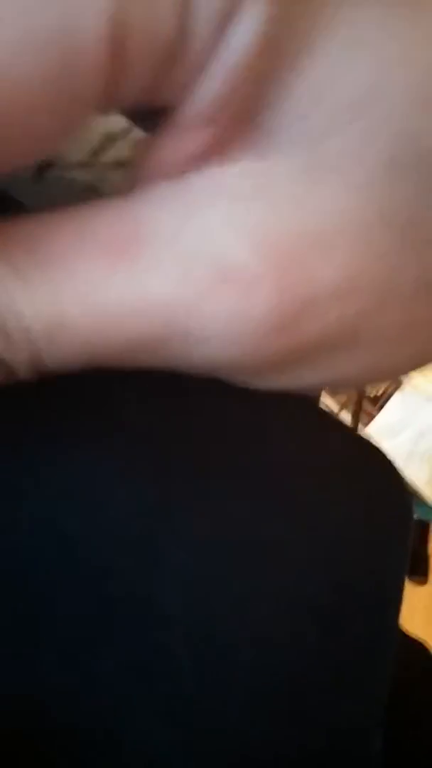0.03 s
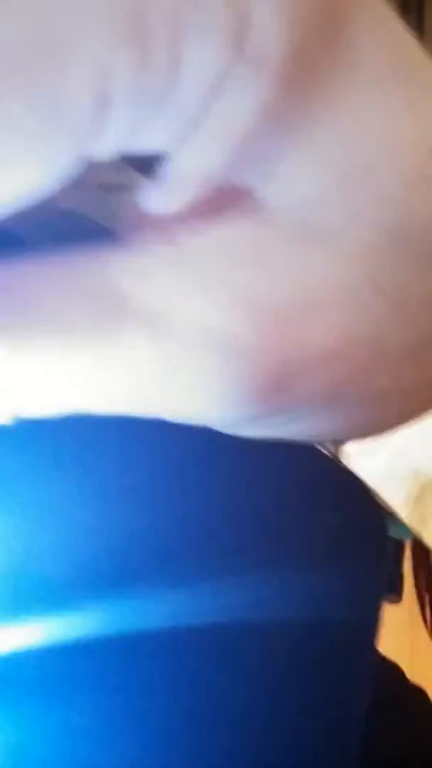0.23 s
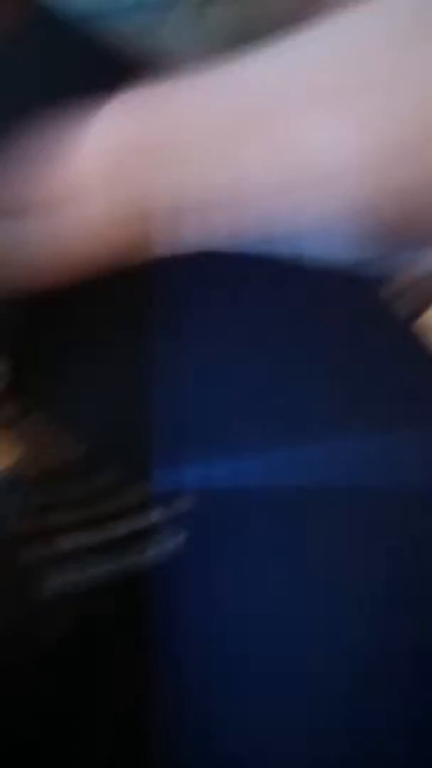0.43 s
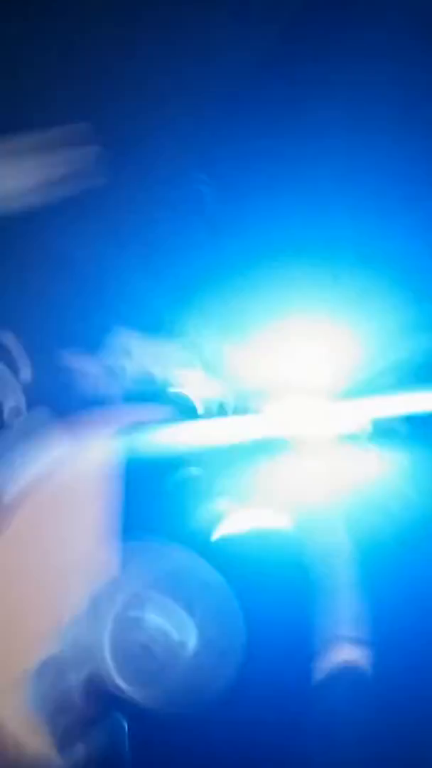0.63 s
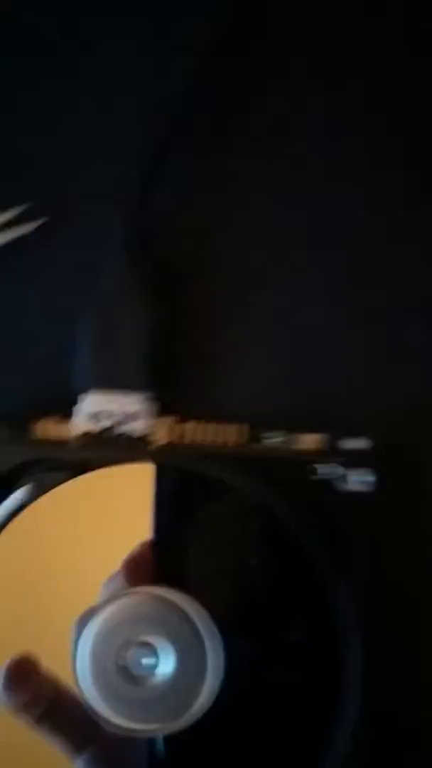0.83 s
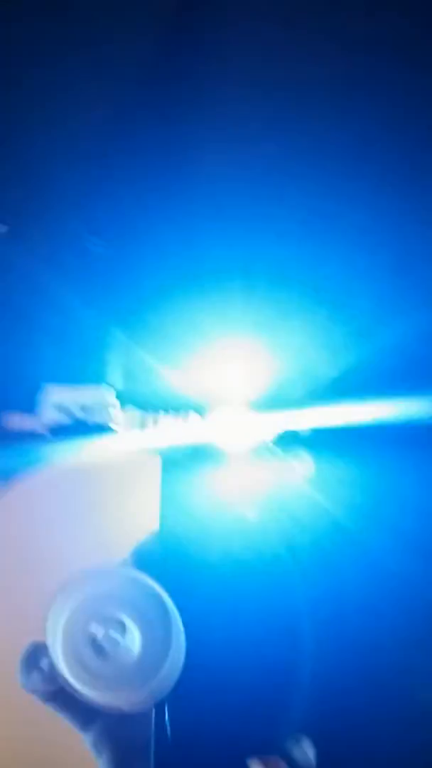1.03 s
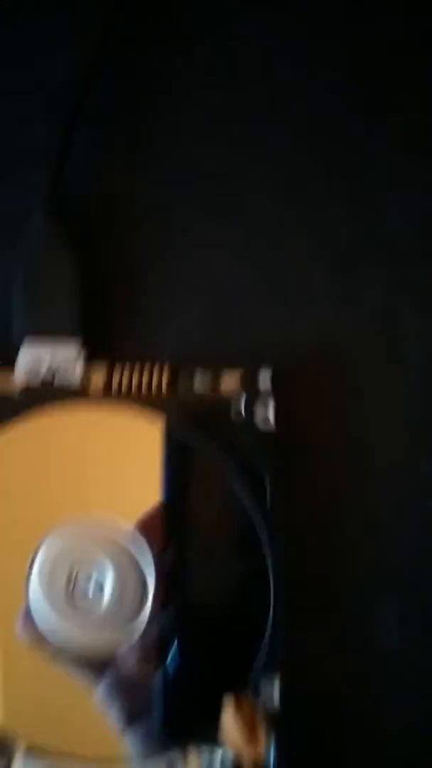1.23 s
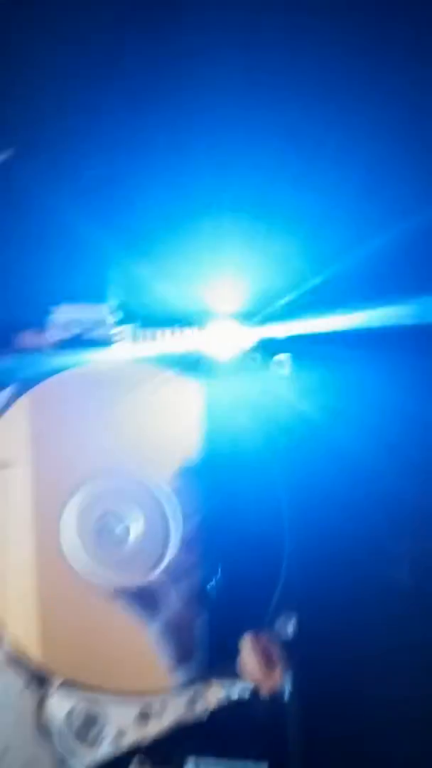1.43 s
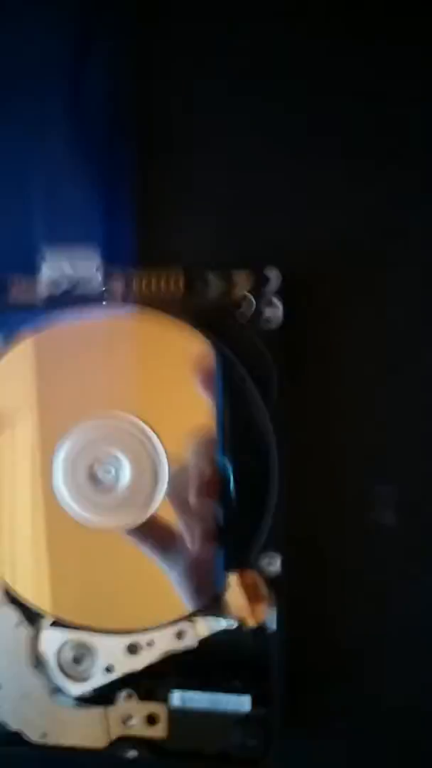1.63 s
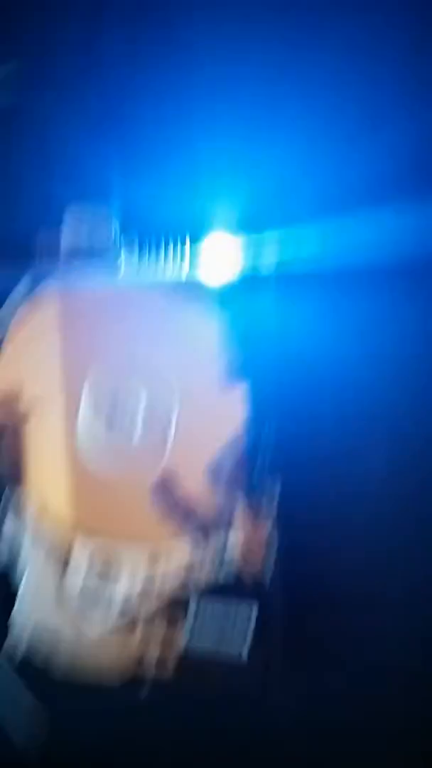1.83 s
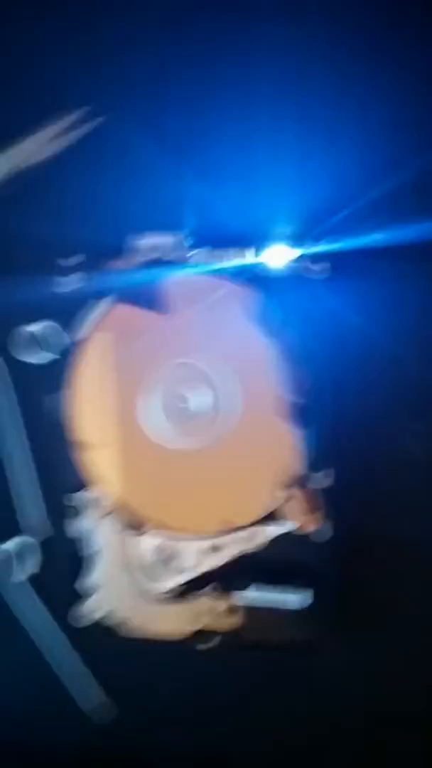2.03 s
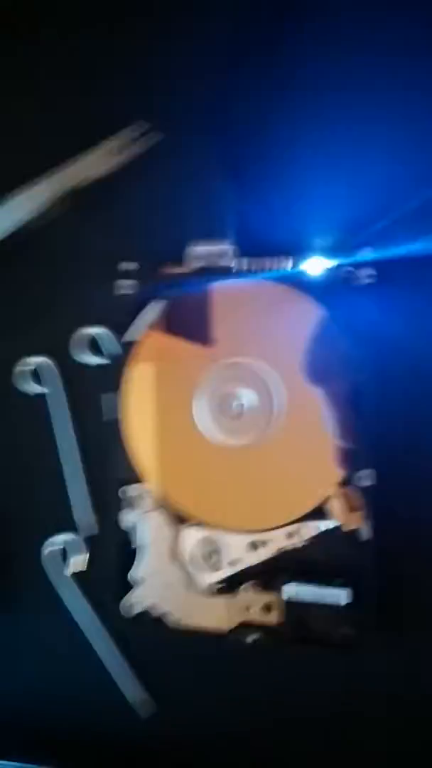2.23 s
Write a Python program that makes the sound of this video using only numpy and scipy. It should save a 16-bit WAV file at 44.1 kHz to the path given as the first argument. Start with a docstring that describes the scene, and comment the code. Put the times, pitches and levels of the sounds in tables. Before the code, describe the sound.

An opened hard drive is handled close by, with a hollow knock at 0.2 seconds and a sharp, rattling metal clack at 0.4, the loudest sound. Fingers softly brush and bump the casing. From 1.8 seconds come a few small dry ticks, the clearest at about 2.3. Throughout, a quiet fan rushes with a thin whine and a slowly pulsing low hum in a small room.

```python
"""An opened hard drive is handled close to the microphone in a small room.
From the start a fan rushes and whines, its motor beating slowly against the mains hum.
A hollow knock on the casing at 0.2 s is followed at 0.4 s by a rattling metal clack.
Fingers softly brush and bump the casing while the background sinks briefly several times.
From 1.8 s a few small dry ticks sound, the last one the loudest."""
import sys
import numpy as np
from scipy import signal
from scipy.fft import rfft, irfft
from scipy.io import wavfile

SR = 44100
rng = np.random.default_rng(int(sys.argv[2]) if len(sys.argv) > 2 else 0)


def to_wav(sig):
    """Store sig (one row per channel, or 1-D mono) as 16-bit WAV at the path in sys.argv[1].

    Samples outside -1..1 are clipped; the rate is SR.
    """
    pcm = np.clip(np.atleast_2d(sig), -1, 1) * 32767
    pcm = np.round(pcm).astype(np.int16)
    wavfile.write(sys.argv[1], SR, pcm.T)  # frames by channels


N = 105840
T = np.arange(N) / SR
HZ = np.maximum(np.fft.rfftfreq(N, 1 / SR), 1)
AGE = np.arange(SR // 2) / SR   # seconds since a hit

# the clack, a quick run of metal contacts: (time [s], level [dB])
CLACK_HITS = [(0.4194, -11.5), (0.4294, -9.5), (0.4342, -9), (0.4354, -7), (0.4372, -0.5), (0.4387, -2.5),
              (0.4398, -10.5)]
# the metal's ring: (frequency [Hz], level [dB], t60 [s], left minus right [dB])
METAL_MODES = [(2400, -35, .02, 4.5), (3110, -32, .022, 17), (3560, -41, 0.028, 9.5),
               (4000, -29, 0.021, 13.5), (4449, -26, .03, 11), (4570, -35.5, 0.071, 8),
               (5856, -20.5, .015, 17), (6290, -24.5, .022, 18), (6450, -39, .09, 15.5),
               (6830, -10.5, 0.013, 17.5), (6550, -40, .25, 12.5), (7875, -27, 0.014, 10.5),
               (8570, -20.5, 0.025, 14.5), (9100, -28, .018, 3.5), (12300, -25.5, 0.006, -14.5)]
# tone colour of each contact's crack: (frequency [Hz], level [dB])
CRACK_COLOUR = [(200, -46), (600, -36), (900, -21), (1500, -18), (2800, -5), (4300, -11), (5200, -6),
                (7000, 3), (9000, -2.5), (10500, -16), (16000, -27.5)]
# blows on the casing, light touches before the weight: (time [s], edge level [dB], body level [dB])
KNOCK_HITS = [(0.217, -21, -48.5), (0.2184, -29, -39), (0.2201, -38.5, -19.5), (0.2224, -31.5, -20),
              (0.2425, -43.5, -39), (0.4384, -36, -22), (0.4403, -39.5, -20.5)]
# the casing's hollow body: (frequency [Hz], level [dB], t60 [s], left minus right [dB])
CASING_MODES = [(865, -16, 0.016, -6.5), (1108, -7, 0.022, -3.5), (1790, -13.5, 0.016, 11.5),
                (2450, -17, 0.027, 5), (3380, -16.5, 0.016, 15), (4200, -17.5, .016, 5),
                (5250, -11.5, 0.015, 11), (6760, -15.5, 0.011, 7)]
# tone colour of the knock's edge: (frequency [Hz], level [dB])
EDGE_COLOUR = [(500, -34.5), (1300, -12), (3500, -14), (5000, -0.5), (8000, 4.5), (10500, -6), (12000, -18),
               (16000, -18)]
# small dry ticks: (time [s], level [dB], left minus right [dB], pitch [ratio])
TICK_HITS = [(1.8485, -50.5, 12, 1.2), (2.0395, -45, 9, 1.55), (2.0490, -41.5, 21.5, 1.454),
             (2.2602, -24, 23.5, 0.984)]
# a tick's ring before it is pitched: (frequency [Hz], level [dB], t60 [s])
TICK_RING = [(3950, -14.5, 0.021), (4720, -1, 0.005), (5660, 2, 0.0054), (6280, -2, 0.0056),
             (7400, -1, 0.002), (10000, -5.5, 0.0018), (13500, -8, .0012)]
# airy finger brushes: (time [s], width [s], level [dB], centre [Hz])
FINGER_BRUSHES = [(0.94, 0.022, -58, 7820), (1.575, 0.018, -61, 13900), (1.851, .005, -50.5, 9250)]
# soft handling bumps: (time [s], width [s], level [dB], centre [Hz])
FINGER_BUMPS = [(0.04, 0.038, -43.5, 337), (0.19, 0.016, -41.5, 800), (0.69, 0.03, -47, 287),
                (1.15, 0.038, -53.5, 326), (1.54, .012, -51, 300), (1.835, 0.016, -41.5, 308),
                (1.972, .008, -44.5, 790), (2.04, 0.02, -43, 315.5), (2.4, 0.029, -46.5, 363)]
# fan and housing resonances: (frequency [Hz], width [Hz], level [dB], left minus right [dB])
FAN_RESONANCES = [(41, 6, -63, 12), (86.4, 8, -62.5, -0.5), (105.2, 5, -59, 2), (121, 9.2, -63, 0.5),
                  (236, 12, -62, 5), (258.1, 8, -59.5, 6.5), (289.25, 4, -54, 3.5), (322.2, 6, -58, 10.5),
                  (371, 30, -61, 9), (743, 44, -57, 7), (860, 180, -59, -4.5), (1808, 160, -73, 13),
                  (8610, 110, -78.5, 8)]
# fader on the fan's tones as the microphone moves: (time [s], gain [dB])
FAN_FADER = [(0, 7.5), (0.3, 2.5), (0.68, 1.5), (0.95, -6), (1.3, 0.5), (1.5, -1.5), (1.68, 4.5),
             (1.85, -1), (2.15, 1), (2.4, 1)]
# tone colour of the rushing air: (frequency [Hz], level [dB])
AIR_COLOUR = [(20, -23), (40, -8.5), (60, -5), (110, 5), (165, -1), (280, 6.5), (380, -3), (470, -8),
              (620, -4.5), (780, 8), (1050, -3.5), (1300, -7), (1600, -17.5), (2400, -14), (3300, -15.5),
              (4400, -21), (7500, -15.5), (11000, -25.5), (15500, -26.5)]
# tone colour of the rush's midrange: (frequency [Hz], level [dB])
MID_COLOUR = [(400, -25.5), (700, 3), (1200, 7.5), (2000, 2), (2600, -13.5), (5000, -21)]
# fader on that midrange: (time [s], level [dB])
MID_FADER = [(0, -51), (0.3, -54.5), (0.6, -60), (1.0, -65), (1.5, -62.5), (1.9, -55.5), (2.2, -50),
             (2.4, -48.5)]
# short rough pulses of the whine: (time [s], width [s], level [dB])
WHINE_PULSES = [(0.09, 0.047, -57.5), (0.238, 0.059, -59), (0.36, 0.043, -57), (0.64, .012, -63.5),
                (0.70, .015, -70), (0.925, 0.015, -62), (1.05, 0.028, -62.5), (1.29, .035, -65.5),
                (1.38, 0.023, -60.5), (1.53, .018, -72), (1.605, 0.043, -58)]
# fader on the hum as the microphone moves: (time [s], gain [dB])
HUM_FADER = [(0, 4), (0.2, 3.5), (0.55, 0), (0.92, 0), (1.1, -6), (1.35, 2.5), (1.75, -2.5), (2.2, 0.5),
             (2.4, -6.5)]
# tone colour of the room's reverb: (frequency [Hz], level [dB])
ROOM_COLOUR = [(300, -2), (1000, 4), (2800, -0.5), (4200, 2.5), (5500, -2), (6700, -10), (8500, -3),
               (11000, -3), (16000, -2.5)]
# the background sinks: (start [s], end [s], depth [dB])
BACKGROUND_DIPS = [(0.366, 0.411, 7.5), (0.717, 0.857, 9.5), (0.814, 0.858, 7), (0.948, 1.053, 3.5),
                   (1.07, 1.131, 2.5), (1.058, 1.26, 6), (1.198, 1.252, 9), (1.442, 1.521, 2.5),
                   (1.891, 1.965, 9.5), (1.973, 2.019, 7), (2.297, 2.387, 5)]
# stereo image of the noise: (frequency [Hz], left-right likeness [0 to 1])
STEREO_LIKENESS = [(60, 0.96), (300, .9), (700, 0.48), (1500, 0.13), (4000, .3), (15000, .1)]

CRACK_DB, CRACK_T60_S, CRACK_PAN_DB = -11, 0.011, 9.5
EDGE_T60_S, EDGE_PAN_DB = 0.0067, 6
BRUSH_OCTAVES, BRUSH_PAN_DB, BUMP_OCTAVES, BUMP_PAN_DB = 0.36, 6, 0.18, 8
AIR_DB, AIR_PAN_DB = -50.5, 4.5
WHINE_HZ, WHINE_WIDTH_HZ, WHINE_FLICKER_DB, WHINE_PAN_DB, WHINE_REST_DB = 2915, 120, 2.74, 7, -71.5
MAINS_HZ, MOTOR_HZ, BEAT_NULL_S = 59.95, 57.56, 0.325
MAINS_DB, MOTOR_DB, HUM_PAN_DB = -47.5, -48.5, 6
EARLY_DB, EARLY_T60_S, TAIL_DB, TAIL_T60_S, TAIL_DELAY_S = -10.5, 0.1, -16, 0.45, 0.015
TICK_SEND_DB = -3.5   # the ticks are close, so less of them reaches the room
SINK_S, RECOVER_S = 0.02, 0.0098
CLIP_CEILING, TICK_TOP_HZ, STOPBAND_HZ = 1.1, 16300, 17000


def clack():
    """A metal part rattles and snaps home: each contact is a bright ring and a crack of noise."""
    out = np.zeros((2, N))
    for time, db in CLACK_HITS:
        metal = strike(METAL_MODES)
        crack = from_db(CRACK_DB) * pan(CRACK_PAN_DB) * burst(CRACK_COLOUR, CRACK_T60_S)
        out += place(time, from_db(db) * (metal + crack))
    return out


def knock():
    """Each blow on the casing has a scratchy edge and a hollow body."""
    out = np.zeros((2, N))
    for time, edge_db, body_db in KNOCK_HITS:
        edge = from_db(edge_db) * pan(EDGE_PAN_DB) * burst(EDGE_COLOUR, EDGE_T60_S)
        body = from_db(body_db) * strike(CASING_MODES)
        out += place(time, edge + body)
    return out


def ticks():
    """Single, heavily damped contacts near the left microphone; the lighter ones ring higher."""
    out = np.zeros((2, N))
    for time, db, pan_db, pitch in TICK_HITS:
        tick = sum((-1) ** k * from_db(db + mode_db) * ring(min(hz * pitch, TICK_TOP_HZ), t60)
                   for k, (hz, mode_db, t60) in enumerate(TICK_RING))
        out += place(time, pan(pan_db) * tick)
    return out


def fingers():
    """Fingers brush and bump the casing."""
    brushes = pan(BRUSH_PAN_DB) * rubs(FINGER_BRUSHES, BRUSH_OCTAVES)
    bumps = pan(BUMP_PAN_DB) * rubs(FINGER_BUMPS, BUMP_OCTAVES)
    return brushes + bumps


def fan():
    """Wavering housing tones, rushing air and a thin, pulsing whine."""
    tones = sum(from_db(db) * pan(pan_db) * tone(hz, width) for hz, width, db, pan_db in FAN_RESONANCES)
    air = from_db(AIR_DB) * pan(AIR_PAN_DB) * noise(from_db(over_hz(AIR_COLOUR)))
    midrange = fader(MID_FADER) * noise(from_db(over_hz(MID_COLOUR)))
    pulses = from_db(WHINE_REST_DB) + sum(swell(time, width, db) for time, width, db in WHINE_PULSES)
    flicker = from_db(WHINE_FLICKER_DB * drift(rate_hz=60))
    whine = pulses * flicker * pan(WHINE_PAN_DB) * tone(WHINE_HZ, WHINE_WIDTH_HZ)
    return fader(FAN_FADER) * tones + air + midrange + whine


def hum():
    """The motor turns just under the mains frequency, so the two swell and cancel in turn."""
    turn = 2 * np.pi * (T - BEAT_NULL_S)
    mains = from_db(MAINS_DB) * np.sin(MAINS_HZ * turn)
    motor = from_db(MOTOR_DB) * np.sin(MOTOR_HZ * turn)
    return fader(HUM_FADER) * pan(HUM_PAN_DB) * (mains - motor)


def room(send):
    """Close reflections from the desk, then a faint longer tail."""
    early = from_db(EARLY_DB) * rms_one(place(.002, burst(ROOM_COLOUR, EARLY_T60_S)))
    tail = from_db(TAIL_DB) * rms_one(place(TAIL_DELAY_S, burst(ROOM_COLOUR, TAIL_T60_S)))
    narrowed = (send + send.mean(axis=0)) / 2
    return signal.fftconvolve(narrowed, (early + tail) / np.sqrt(N), axes=1)[:, :N]


def dips():
    """Gain of the background: it slides down and comes back quickly."""
    depth_db = sum(db * np.clip((T - start) / SINK_S, 0, 1) * np.clip((end - T) / RECOVER_S + .5, 0, 1)
                   for start, end, db in BACKGROUND_DIPS)
    return from_db(-depth_db)


def strike(modes):
    """One blow on a body: each mode rings with a slightly new strength."""
    return sum((-1) ** k * from_db(db + rng.normal(0, 1)) * pan(pan_db) * ring(hz, t60)
               for k, (hz, db, t60, pan_db) in enumerate(modes))


def ring(hz, t60):
    """A dying sine."""
    return np.sin(2 * np.pi * hz * AGE) * decay(t60)


def burst(colour, t60):
    """Dying noise through a minimum-phase EQ, which keeps its attack clean."""
    cepstrum = irfft(np.log(rms_one(from_db(over_hz(colour)))), N)
    causal = cepstrum * (1 + np.sign(T)) * (T < T[-1] / 2)
    eq = irfft(np.exp(rfft(causal)), N)[:SR // 50]
    white = rng.standard_normal((2, len(AGE))) * decay(t60)
    return signal.fftconvolve(white, eq[None], axes=1)[:, :len(AGE)]


def rubs(rows, octaves):
    """Soft contacts: each is a swell of noise around its own centre frequency."""
    return sum(swell(time, width, db) * noise(np.exp(-(np.log2(HZ / hz) / octaves) ** 2 / 2))
               for time, width, db, hz in rows)


def tone(hz, width_hz):
    """Noise through a steep resonance, its swings evened out."""
    band = noise(1 / (1 + ((HZ - hz) / width_hz) ** 2) ** 2)
    envelope = np.abs(signal.hilbert(band)).mean(axis=0)
    return rms_one(band / np.sqrt(envelope + 1e-9))


def noise(gain):
    """Coloured stereo noise at unit rms, centred in the bass and wide in the treble."""
    mid, side = rfft(rng.standard_normal((2, N)))
    alike = np.clip(over_hz(STEREO_LIKENESS), 0, 1)
    stereo = np.sqrt(1 + alike) * mid + np.sqrt(1 - alike) * side * [[1], [-1]]
    return rms_one(irfft(gain * stereo, N))


def drift(rate_hz):
    """A smooth random wobble at unit rms."""
    return rms_one(irfft(rfft(rng.standard_normal(N)) / (1 + (HZ / rate_hz) ** 2), N))


def decay(t60):
    """An envelope that falls 60 dB in t60 seconds."""
    return from_db(np.maximum(-60 * AGE / t60, -300))


def swell(time, width, db):
    """A smooth rise and fall of gain around a moment."""
    return from_db(db) * np.exp(-np.minimum(((T - time) / width) ** 2, 20))


def fader(points):
    """Gain that rides straight ramps in dB."""
    return from_db(np.interp(T, *np.transpose(points)))


def over_hz(points):
    """A curve of straight lines over log frequency."""
    hz, value = np.transpose(points)
    return np.interp(np.log(HZ), np.log(hz), value)


def place(time, x):
    """Drop a short stereo sound onto the timeline."""
    return np.pad(x, ((0, 0), (int(time * SR), N)))[:, :N]


def pan(db):
    """Channel gains with the left db louder than the right."""
    return from_db(np.array([[.5], [-.5]]) * db)


def from_db(db):
    """Decibels to gain."""
    return 10 ** (np.asarray(db) / 20)


def rms_one(x):
    """Scale to unit rms."""
    return x / np.sqrt(np.mean(x ** 2) + 1e-20)


def scene():
    """Close handling up front; behind it the reverb, fan and hum sink together in the dips."""
    handling = clack() + knock() + fingers()
    ticking = ticks()
    background = room(handling + from_db(TICK_SEND_DB) * ticking) + fan() + hum()
    return handling + ticking + dips() * background


def record(dry):
    """A soft clip rounds off the loudest peak and a steep low-pass cuts the top."""
    clipped = CLIP_CEILING * np.tanh(dry / CLIP_CEILING)
    return signal.sosfilt(signal.cheby2(12, 60, STOPBAND_HZ, fs=SR, output="sos"), clipped)


dry = scene()
out = record(dry)
to_wav(out)
```